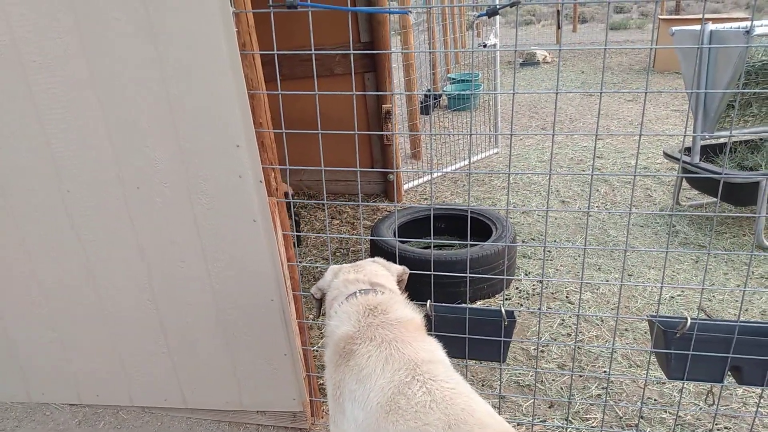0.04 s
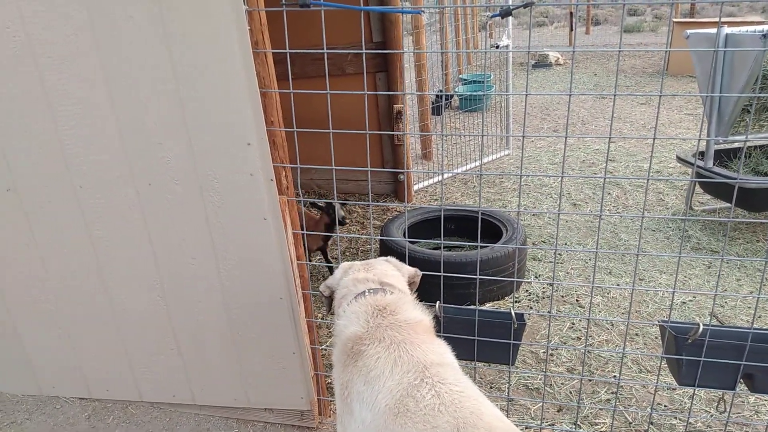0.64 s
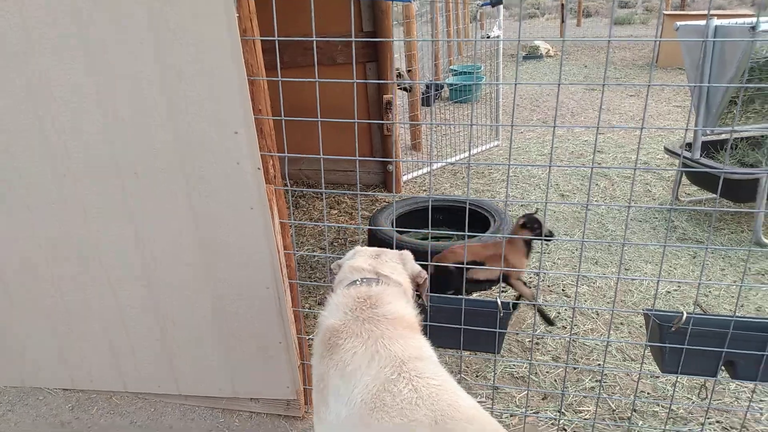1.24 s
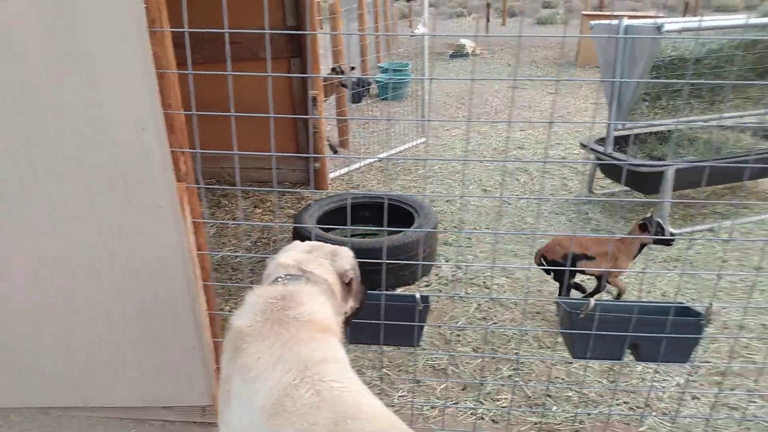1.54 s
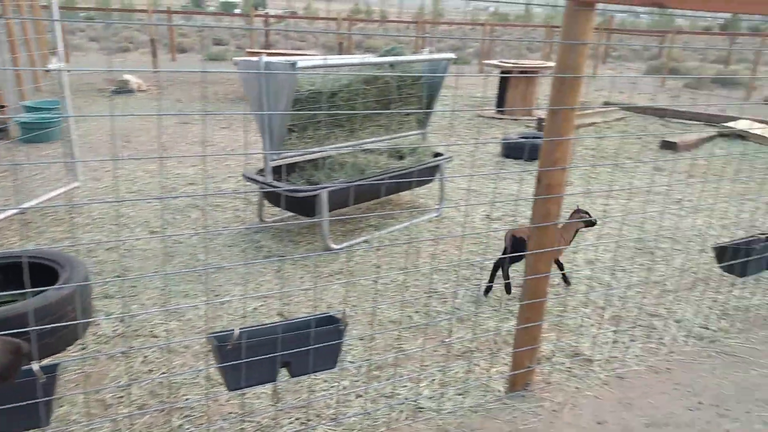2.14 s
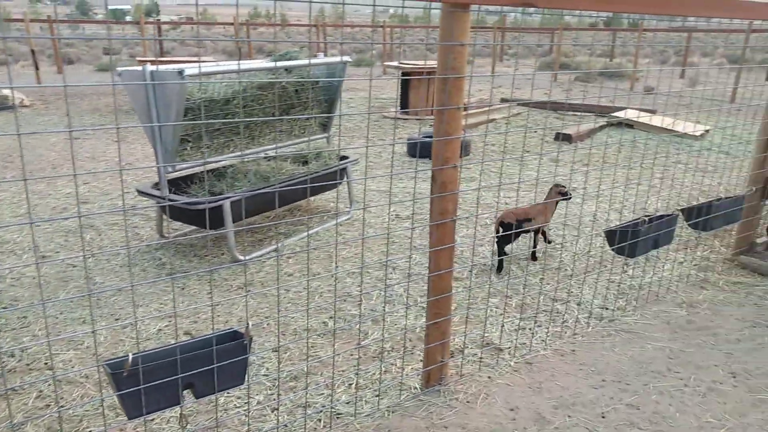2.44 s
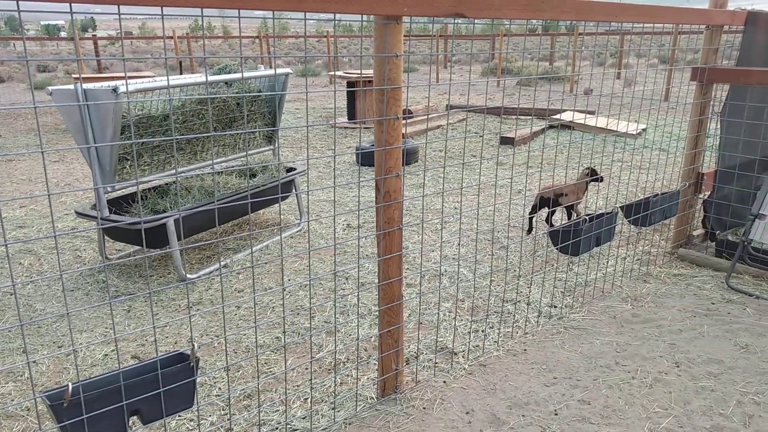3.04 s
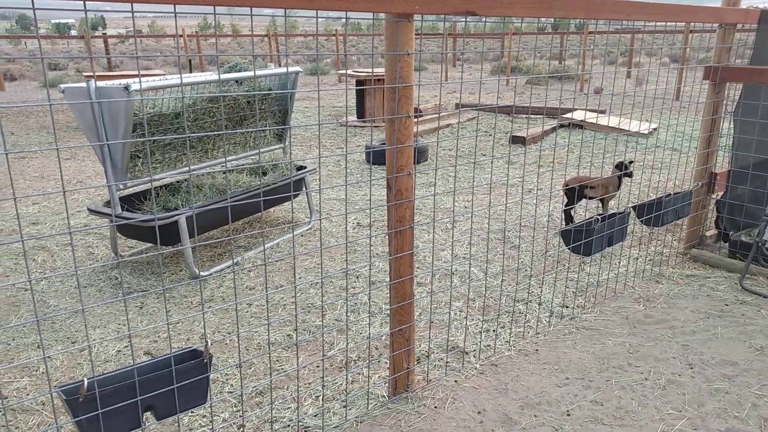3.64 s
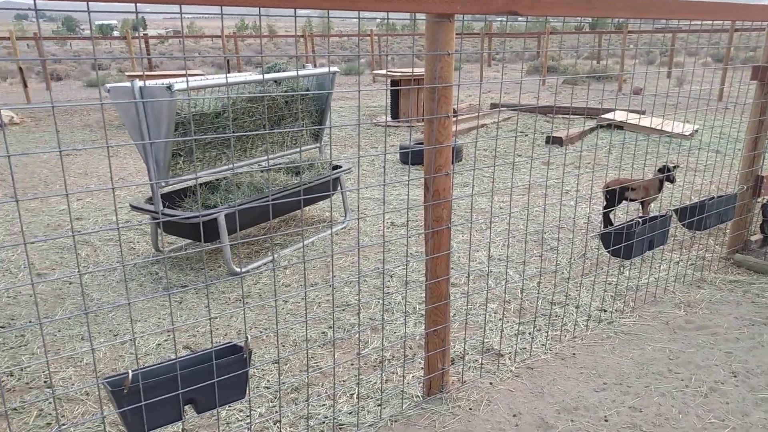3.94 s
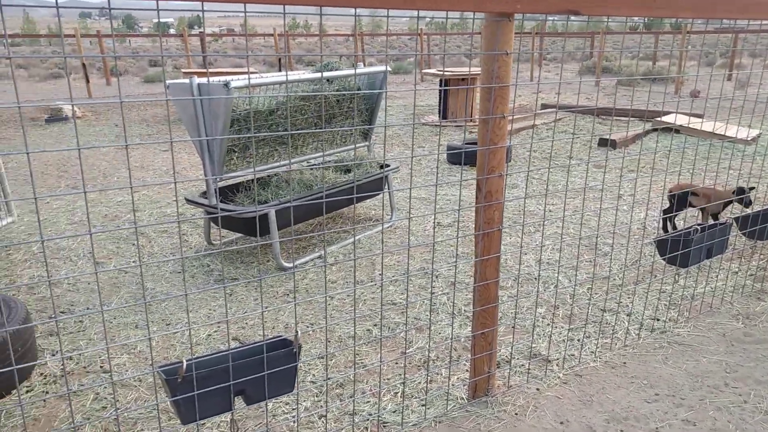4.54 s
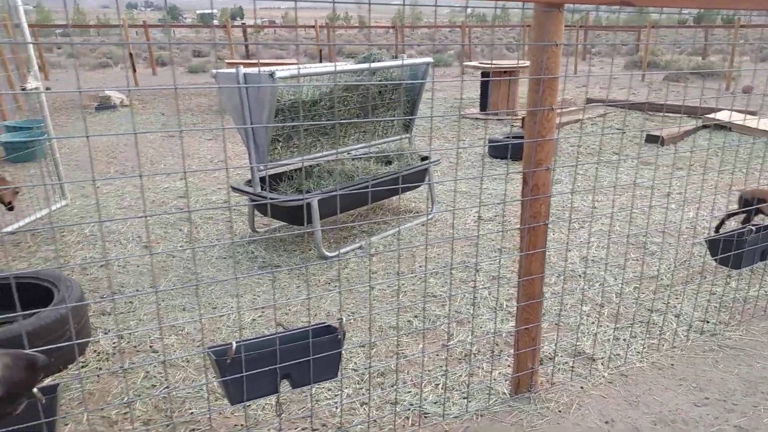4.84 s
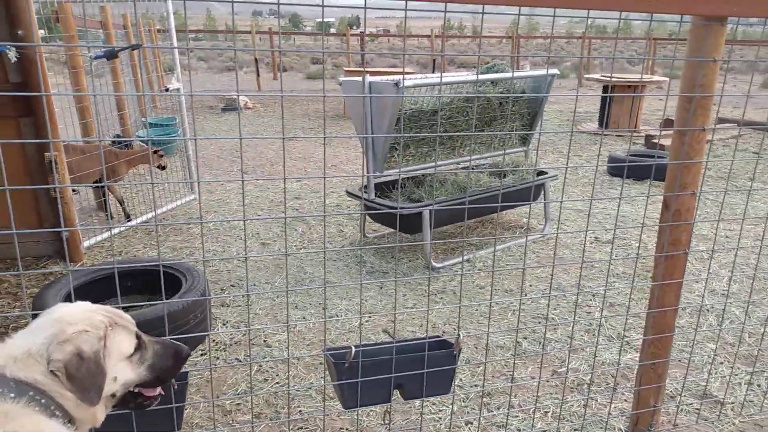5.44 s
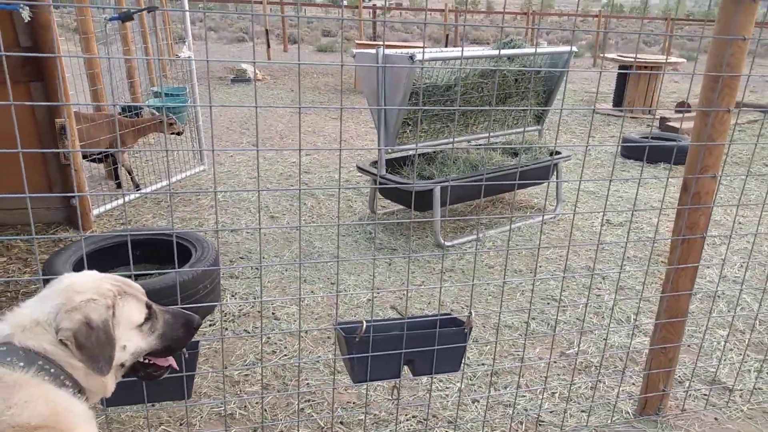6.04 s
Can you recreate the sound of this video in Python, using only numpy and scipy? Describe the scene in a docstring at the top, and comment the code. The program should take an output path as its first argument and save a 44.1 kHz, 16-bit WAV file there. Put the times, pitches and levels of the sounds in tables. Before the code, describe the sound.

A lamb and a ewe trade quavering bleats in an outdoor pen, with soft hoof knocks and faint rustling straw.

```python
"""A lamb in a straw-covered pen gives a short, high bleat that cracks. After a soft, low knock a ewe answers in
low throbs, mouth shut, then wide open, while the running lamb joins in. Another faint grunt comes, the standing
lamb quavers from the far end, and two more grunts follow. Each voice is glottal pulses and breath through a
resonant throat. Throughout, hooves knock, straw ticks and an engine drones far away; two spaced microphones
listen."""
import sys
import numpy as np
from scipy import signal
from scipy.fft import rfft, irfft, next_fast_len
from scipy.io import wavfile
from scipy.ndimage import uniform_filter1d, map_coordinates

SR = 44100
rng = np.random.default_rng(int(sys.argv[2]) if len(sys.argv) > 2 else 0)


def digitize_waveform(pressure):
    """Quantize a signal to 16-bit integers and store it at the path in sys.argv[1].

    Rows of a 2-D input are taken as channels; values are limited to [-1, 1].
    """
    field = np.atleast_2d(pressure).T
    bounded = np.clip(field, -1, 1)
    quanta = np.round(bounded * 32767).astype(np.int16)
    wavfile.write(sys.argv[1], SR, quanta)


N = 276507
T = np.arange(N) / SR

# Ewe's throbs: crest_s, pitch_hz, level_db, roughness, next_dip_s, dip_depth_db, sag_hz
EWE_THROBS = [(1.138,162,-40.5,0.29,1.18,26,8), (1.222,167.6,-42,0.56,1.266,23.5,9.7),
              (1.31,188.1,-32,0.31,1.343,20,26.3), (1.388,178.9,-25.5,0.27,1.414,15,22.3),
              (1.464,187.2,-20.5,.22,1.492,14,16.3), (1.535,189.4,-18.5,0.11,1.564,4,2.97),
              (1.602,192.9,-17,.1,1.644,17,15), (1.686,188.8,-19.5,0.2,1.734,19,19.9),
              (1.782,174.9,-22.5,.35,1.823,22,14.1)]
# Her throat through the mouth and through the nose: freq_hz, gain_db
EWE_MOUTH = [(190, -30), (380, -20.5), (570, -11), (760,-15.5), (950,-23), (1320,-13), (1520,-19),
             (1700,-21), (1890,-13.5), (2080,-22), (2270,-21), (2520,-27.5), (2850,-21), (3700, -33.5),
             (6000, -41), (7000, -49.5), (10000, -50.5), (15000, -59.5)]
EWE_NOSE = [(60,-36), (115,-7), (175,6), (260,-6), (380,-10), (580,-13), (820,-31), (1400,-26),
            (2400,-22.5), (3300,-31), (6000,-49)]
# Sharp mouth resonances: freq_hz, width_hz, boost_db
EWE_RESONANCES = [(565, 50, 15.5), (1525, 55, 21), (2272, 70, 13.5)]
def ewe():
    """Three low throbs through the nose give way to a bright open-mouthed bleat."""
    open_at_s, opening_s = 1.35, .025
    lip_leak_db, nose_open_db = -12, -44.5
    arch_top_s, arch_half_s = 1.574, .22
    pitch_hz, crest_db, dip_db, roughness = throbs(EWE_THROBS, lead_s=.047, dip_power=2.7, sag_power=1.8)
    source = folds(pitch_hz + 1.1 * wobble(60), roughness, jitter=.036, hiss=1.5, hiss_hz=5000)
    shut = (1 - np.tanh((T - open_at_s) / opening_s)) / 2
    bass_db = crest_db + dip_db
    treble_db = -17.5 - 16.5 * np.abs((T - arch_top_s) / arch_half_s) ** 1.45 + .45 * dip_db
    mouth = voiced(source, resonant(EWE_MOUTH, EWE_RESONANCES))
    mouth = amp(bass_db + lip_leak_db * shut) * shelf(mouth, treble_db - bass_db, corner_hz=1000)
    nose_db = shut * bass_db + (1 - shut) * (nose_open_db + .7 * dip_db)
    nose = amp(nose_db) * voiced(source, colour(EWE_NOSE))
    return microphones(mouth + nose, left_lead_ms=.41)


# Lamb's throat on the held note: freq_hz, gain_db
THROAT_HELD = [(200, -7), (340, -28.5), (660, -1.5), (1020, -1), (1350, -2.5), (1650, -9.5), (2050, -10.5),
               (2450, -25.5), (3050, -5), (3600, -24.5), (4700, -9), (6500, -17.5), (9000, -33),
               (15000, -36.5)]
def lamb_held_note():
    """A clean note sinks until it cracks, drops and dies."""
    start_hz, sink_hz_per_s, drop_hz = 345, 75, 28.9
    crack_at_s, crack_s, release_s = .093, .03, .042
    since_s = np.maximum(T - crack_at_s, 0)
    cracked = np.minimum(since_s / crack_s, 1)
    pitch_hz = start_hz - sink_hz_per_s * np.minimum(T, crack_at_s) - drop_hz * cracked
    source = folds(pitch_hz, roughness=.02 + .36 * cracked ** 2, jitter=.05, hiss=2.2, hiss_hz=6900)
    level_db = -37.5 - 10 * (since_s / release_s) ** 2
    voice = voiced(source, resonant(THROAT_HELD, [(3055, 76, 4)]))
    return microphones(amp(level_db) * voice, left_lead_ms=.08)


# Lamb's throbs per bleat: crest_s, pitch_hz, level_db, roughness, next_dip_s, dip_depth_db, sag_hz
THROBS_RUNNING = [(1.622,320.1,-36,0.24,1.62,12,50.05), (1.692,339,-33,.2,1.725,12,49.98),
                  (1.759,337.2,-31,.15,1.796,11,49.94), (1.832,322.3,-35,0.18,1.879,22,52),
                  (1.916,330.6,-40.5,.2,1.972,30.5,61.9), (2.016,318.5,-45,0.23,2.061,24,52),
                  (2.1,316.2,-44,0.28,2.148,26,52)]
THROBS_STANDING = [(4.125,320.8,-51,.3,4.152,7.6,32), (4.191,329,-46,.25,4.218,5,32),
                   (4.25,329,-43.5,.2,4.274,1,26), (4.318,326.7,-42,.2,4.357,3,32),
                   (4.388,333.1,-43,.2,4.407,.5,22), (4.432,335.1,-42.5,.15,4.45,.5,11),
                   (4.468,334,-43.5,.15,4.492,1.5,29), (4.519,330.7,-44,.25,4.548,3.4,38),
                   (4.58,329.7,-44.5,.35,4.61,3.3,35), (4.646,331.1,-45.5,.4,4.69,4.5,35),
                   (4.725,327.8,-50,.4,4.756,13,30)]
# Its throat per bleat: freq_hz, gain_db
THROAT_RUNNING = [(200, -26.5), (320, -15.5), (640, -10.5), (980, 3), (1300, 0), (1600, -6), (3000, -14),
                  (3700, -25), (4500, -19), (5800, -8.5), (7300, -29), (9000, -31), (10800, -30.5),
                  (15000, -41)]
THROAT_STANDING = [(200, -9.5), (320, -10.5), (640, -5.5), (970, 2.5), (1250, 5.5), (1450, 1), (1620, -7),
                   (1950, -1), (2250, -8), (2950, -7.5), (3900, -13.5), (4600, -10.5), (5200, -10),
                   (7000, -15), (9500, -25), (15000, -28.5)]
# Sharp throat resonances: freq_hz, width_hz, boost_db
LAMB_RESONANCES = [(975, 110, 5), (1260, 110, 2), (1960, 110, 2), (2950, 130, 5), (4620, 180, 9)]
def lamb_bleat(rows, throat, lead_s, dip_power, sag_power, dulling):
    """A quavering bleat from the right: duller with less effort, rasping in each sag."""
    pitch_hz, crest_db, dip_db, roughness = throbs(rows, lead_s, dip_power, sag_power)
    source = folds(pitch_hz + 2.5 * wobble(90), roughness, jitter=.038, hiss=.8, hiss_hz=7500)
    voice = voiced(source, resonant(throat, LAMB_RESONANCES))
    voice = shelf(voice, treble_db=-dulling * (crest_db.max() - crest_db), corner_hz=3280)
    return microphones(amp(crest_db + dip_db) * voice, left_lead_ms=-.27)


# A soft, low knock, then three grunts: crest_s, pitch_hz, level_db
SOFT_THROBS = [(1.008, 214.5, -64.5), (2.734, 320, -70), (4.853, 310.8, -63.5), (5.055, 332.5, -56.5)]
# Their muffled colour: freq_hz, gain_db
MUFFLED_SPECTRUM = [(150, 2.5), (320, 2), (700, -3), (1100, -9.5), (2000, -24), (5000, -36.5)]
def grunts():
    """A soft, low knock at 1.0 s, then three faint closed-mouth grunts."""
    crest_s, pitch_hz, _ = np.transpose(SOFT_THROBS)
    envelope = sum(swell(at_s, level_db, half_s=.0123) for at_s, _, level_db in SOFT_THROBS)
    source = folds(np.interp(T, crest_s, pitch_hz), roughness=.12, jitter=.015, hiss=4.6, hiss_hz=2000)
    return envelope * voiced(source, colour(MUFFLED_SPECTRUM))


def throbs(rows, lead_s, dip_power, sag_power):
    """Each throb arches between two dips, where the slack folds sag in pitch and roughen."""
    crest_s, pitch_hz, level_db, roughness, next_dip_s, depth_db, sag_hz = np.transpose(rows)
    throb = np.minimum(np.searchsorted(next_dip_s, T), len(crest_s) - 1)
    dip = throb + (T > crest_s[throb])
    dip_s = np.r_[crest_s[0] - lead_s, next_dip_s][dip]
    away = np.abs((T - crest_s[throb]) / (dip_s - crest_s[throb] + 1e-9))  # 0 at crest, 1 at dip
    slack = np.sin(np.pi / 2 * np.minimum(away, 1) ** sag_power) ** 2
    dip_db = -np.minimum(np.abs(depth_db[dip - 1]) * away ** dip_power, 300)
    sagged_hz = np.interp(T, crest_s, pitch_hz) - sag_hz[dip - 1] * slack
    roughened = np.interp(T, crest_s, roughness) + .33 * slack
    return sagged_hz, np.interp(T, crest_s, level_db), dip_db, roughened


def folds(pitch_hz, roughness, jitter, hiss, hiss_hz):
    """Glottal pulses, less regular when rough, with a puff of turbulence in each cycle."""
    roughness = np.clip(roughness, 0, 1)
    cycles = np.cumsum(pitch_hz * (1 + jitter * roughness * wobble(300))) / SR
    closures = np.interp(np.arange(1, int(cycles[-1])), cycles, np.arange(N))
    taps = closures.astype(int)[:, None] + np.arange(-7, 9)
    offset = taps - closures[:, None]
    impulses = np.sinc(offset) * np.cos(np.pi * offset / 16) ** 2  # band-limited
    pulses = unit(np.bincount(np.clip(taps, 0, N - 1).ravel(), impulses.ravel(), N))
    shimmer = amp(4.5 * roughness * wobble(220))
    puffs = unit(rng.standard_normal(N) * (1.3 + np.cos(2 * np.pi * cycles)))
    breath = filtered(puffs, lambda hz: (hiss_hz / 4 + 1j * hz) / (hiss_hz + 1j * hz))  # bass 12 dB down
    return shimmer * pulses + hiss * np.sqrt(roughness) * breath


def resonant(points, resonances):
    """A throat's broad colour times its sharp resonances."""
    def peak(hz, freq_hz, width_hz, boost_db):
        damping = 1j * hz * width_hz
        return 1 + (amp(boost_db) - 1) * damping / (freq_hz ** 2 - hz ** 2 + damping)
    return lambda hz: colour(points)(hz) * np.prod([peak(hz, *row) for row in resonances], axis=0)


def voiced(source, throat):
    """The source through a throat, held at rms 1."""
    sound = filtered(source, throat)
    return sound / np.sqrt(np.abs(uniform_filter1d(sound ** 2, size=900)) + 1e-12)


# Colour difference between the microphone ports: freq_hz, left_minus_right_db
PORT_BALANCE = [(300, 1), (700, 1), (1100, -0.5), (1550, -4.5), (2100, -4.5), (2900, -1.5), (3500, 5.5),
                (5700, 3.5), (7000, -0.5), (15000, 4.5)]
def microphones(x, left_lead_ms):
    """Two spaced ports hear a voice with different delay and colour."""
    def ports(hz):
        tilt = amp(log_interp(PORT_BALANCE, hz))
        left = np.sqrt(tilt) * np.exp(1j * np.pi * hz * left_lead_ms / 1000)
        return np.array([left, 1 / left]) / np.sqrt(np.cosh(np.log(tilt)))
    return filtered(x, ports)


# Hoof knocks and snapping straws: start_s, level_db, left_minus_right_db
HOOF_KNOCKS = [(0.206, -49, 3), (1.201, -37.5, 0), (1.229, -37, 2), (2.301, -61.5, 1), (5.136, -57.5, -3),
               (5.225, -58, -0.5), (5.255, -54, -3.5)]
STRAW_TICKS = [(0.1702, -41.5, 1.5), (0.4524, -43, 4), (0.5442, -53.5, 24), (1.1046, -51, 1.5),
               (2.7896, -45, 7), (3.0125, -50, 5.0), (3.5414, -49, 11.5), (3.6237, -48.5, 8.5),
               (3.7006, -47, 5), (3.8449, -50, 6), (5.1412, -45.5, 11), (5.2241, -47.5, 9),
               (5.7001, -50, 11)]
# Their spectra: freq_hz, gain_db
HOOF_SPECTRUM = [(100, -8), (250, 5.5), (900, -5), (1900, -4), (3400, -10.5), (4500, -24), (15000, -32.5)]
TICK_SPECTRUM = [(500, -38), (2000, -4.5), (4500, -3.5), (9000, 0), (15000, 6)]
def contacts(rows, spectrum, t60_s, gain_db):
    """Each contact is a short dying burst of crushed straw and earth."""
    track = np.zeros((2, N + SR))
    t = np.arange(SR // 8) / SR
    for start_s, level_db, pan_db in rows:
        burst = (rng.standard_normal(len(t)) + rng.standard_normal((2, len(t)))) * amp(-60 * t / t60_s)
        gains = amp(level_db + gain_db + np.array([[pan_db], [-pan_db]]) / 2)
        track[:, round(start_s * SR):][:, :len(t)] += gains * burst
    return filtered(track[:, :N], colour(spectrum))


# Foot scuffs: crest_s, level_db, half_s
SCUFFS = [(0.599, -61.5, 0.0095), (2.308,-63,0.0056), (2.341,-68,0.019), (2.864,-70,.025),
          (2.931,-67.5,0.028), (3.081,-67,0.014), (3.139,-60.5,0.011), (3.52,-68,0.04), (3.745,-66.5,.015),
          (3.885,-73,0.01), (4.055,-69,0.018)]
# Rubbed straw: freq_hz, gain_db
SCUFF_SPECTRUM = [(600, -22), (1400, -5), (2000, 2), (3000, -5), (6000, -7), (15000, -10.5)]
def bedding():
    """Restless feet scuff the straw and snap tiny stalks; the rustle fades as the animals settle."""
    snaps_per_s, settling_db_per_s = 45, 2
    friction = filtered(rng.standard_normal((2, N)), colour(SCUFF_SPECTRUM))
    friction = unit(friction * amp(3 * wobble(16) + 3.4 * wobble(90)))
    breaks = (rng.random(N) < snaps_per_s / SR) * amp(4 * np.clip(rng.standard_normal(N), -1, 1))
    snaps = unit(filtered(breaks * rng.standard_normal((2, N)), colour(TICK_SPECTRUM)))
    scuffs = sum(swell(*row) for row in SCUFFS) * shelf(friction, treble_db=-7.5, corner_hz=3750)
    rustle = amp(-71 - settling_db_per_s * T) * (friction + amp(-4) * snaps)
    return scuffs + rustle


def scattered(x):
    """Straw, wire and boards close by smear each pulse over a few milliseconds."""
    bands_hz = np.arange(0, SR / 2, 170)
    detours_rad = np.cumsum(np.r_[0, rng.uniform(0, np.pi, len(bands_hz) - 1)])
    smeared = filtered(x, lambda hz: np.exp(-1j * np.interp(hz, bands_hz, detours_rad)))
    spray = filtered(echo(x, t60_s=.04, wet_db=-6), lambda hz: 1j * hz / (3500 + 1j * hz))
    return amp(-.7) * smeared + spray


def echo(x, t60_s, wet_db):
    """Ground, shed and feeders scatter a short tail."""
    t = np.arange(SR // 2) / SR
    tail = rng.standard_normal((2, len(t))) * amp(-60 * t / t60_s) * (t > .003)
    return amp(wet_db) * signal.fftconvolve(x, tail / np.linalg.norm(tail[0]), axes=1)[:, :N]


def engine():
    """A distant engine drones unsteadily and slowly grows louder."""
    pitch_hz = 76.5 + 2.4 * wobble(9)
    phase = 2 * np.pi * np.cumsum(pitch_hz) / SR
    octave = .099 * amp(4.2 * wobble(3)) * np.sin(2 * phase)
    level_db = -74 + .66 * T + 2.2 * wobble(6.6)
    return amp(level_db) * unit(np.sin(phase) + octave)


# Outdoor air: freq_hz, gain_db
AIR_SPECTRUM = [(12, -43), (20, -19.5), (53, -7), (81, -0.5), (98, -6.5), (123, -6.5), (285, -18),
                (485, -21.5), (574, -20), (1290, -28.5), (1960, -26), (2460, -33), (7110, -37),
                (14700, -32), (16000, -33.5)]
def air():
    """Faint outdoor noise, narrow in the bass and wide in the treble."""
    mid, side = filtered(rng.standard_normal((2, N)), colour(AIR_SPECTRUM))
    side = filtered(side, colour([(30, -4.5), (80, -12.5), (300, -7), (1200, 2.5), (5000, -.5)]))
    return amp(-69) * unit(np.array([mid + side, mid - side]))


def amp(db):
    """Decibels to gain."""
    return 10 ** (np.asarray(db) / 20)


def unit(x):
    """Scale to rms 1."""
    return x / np.sqrt(np.mean(x ** 2) + 1e-20)


def swell(crest_s, level_db, half_s):
    """A Gaussian envelope."""
    return amp(level_db) * np.exp(-((T - crest_s) / half_s) ** 2)


def wobble(knots_per_s):
    """A smooth random curve."""
    knots = rng.standard_normal(int(N * knots_per_s / SR) + 4)
    return map_coordinates(knots, [T * knots_per_s])


def log_interp(points, hz):
    """Interpolate (freq_hz, value) points on a log frequency axis."""
    freq_hz, values = np.transpose(points)
    return np.interp(np.log(hz + 1), np.log(freq_hz + 1), values)


def filtered(x, response):
    """Apply a complex frequency response."""
    size = 2 * next_fast_len(N // 2 + 8192)
    return irfft(rfft(x, size) * response(np.fft.rfftfreq(size, 1 / SR)), size)[..., :N]


def colour(points):
    """Minimum-phase response through (freq_hz, gain_db) points."""
    def response(hz):
        cepstrum = irfft(np.log(amp(log_interp(points, hz))))
        cepstrum[1:len(hz) - 1] *= 2
        cepstrum[len(hz):] = 0
        return np.exp(rfft(cepstrum))
    return response


def shelf(x, treble_db, corner_hz):
    """Change the level above the corner."""
    low = filtered(x, lambda hz: 1 / (1 + (hz / corner_hz) ** 4))
    return low + amp(treble_db) * (x - low)


def scene():
    """The animals in their pen; from its far end the lamb's voice carries more echo."""
    running = lamb_bleat(THROBS_RUNNING, THROAT_RUNNING,
                         lead_s=.04, dip_power=1.8, sag_power=.93, dulling=.28)
    standing = lamb_bleat(THROBS_STANDING, THROAT_STANDING,
                          lead_s=.013, dip_power=2.6, sag_power=1.3, dulling=.75)
    far = standing + echo(standing, t60_s=.088, wet_db=-6.5)
    animals = scattered(ewe() + lamb_held_note() + running + far + grunts())
    hooves = contacts(HOOF_KNOCKS, HOOF_SPECTRUM, t60_s=.104, gain_db=-.5)
    ticks = contacts(STRAW_TICKS, TICK_SPECTRUM, t60_s=.019, gain_db=-12.5)
    pen = animals + hooves + ticks + bedding()
    return pen + echo(pen, t60_s=.2, wet_db=-20) + engine() + air()


def record(dry):
    """The recorder keeps nothing above its band limit."""
    return filtered(dry, lambda hz: hz < 16200)


dry = scene()
out = record(dry)
digitize_waveform(out)
```